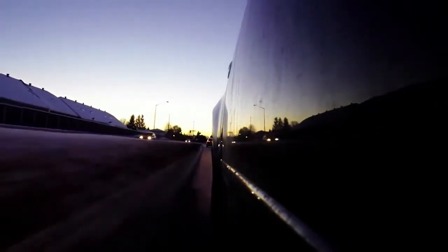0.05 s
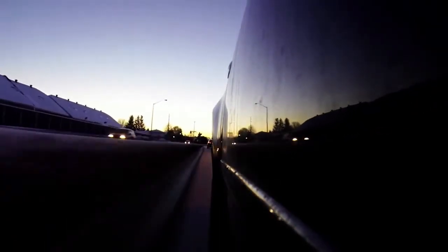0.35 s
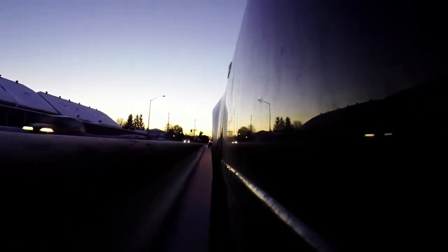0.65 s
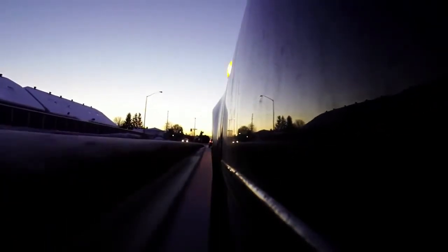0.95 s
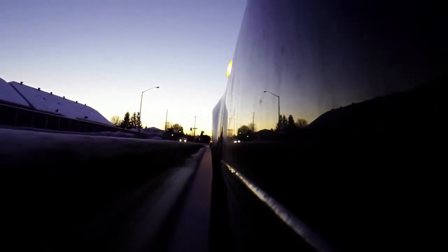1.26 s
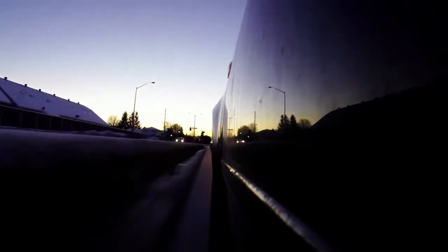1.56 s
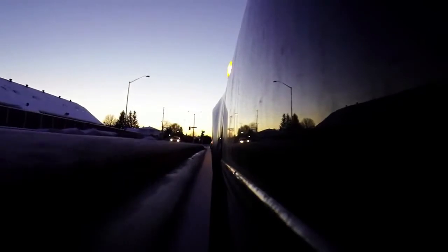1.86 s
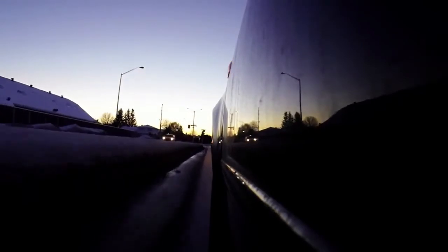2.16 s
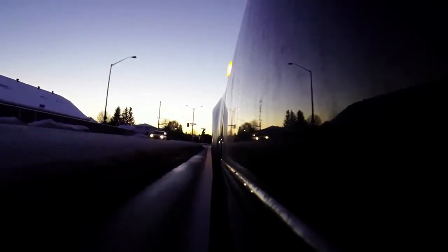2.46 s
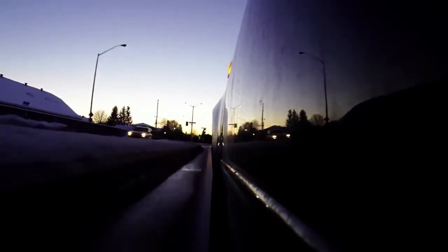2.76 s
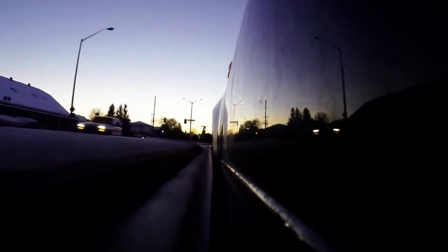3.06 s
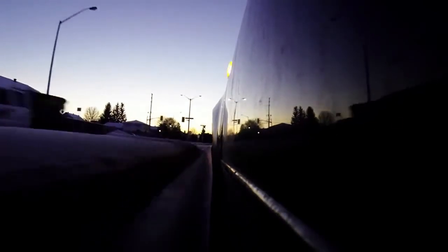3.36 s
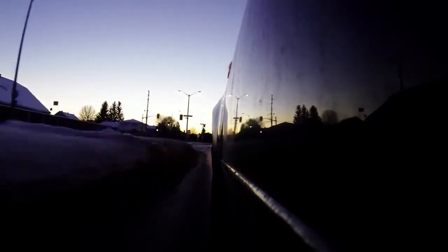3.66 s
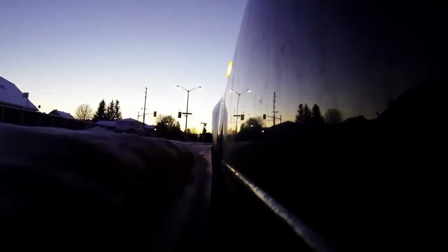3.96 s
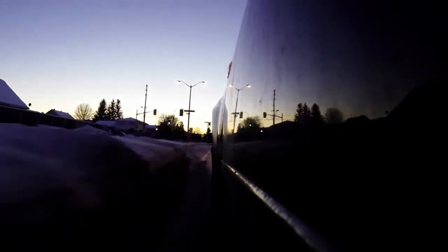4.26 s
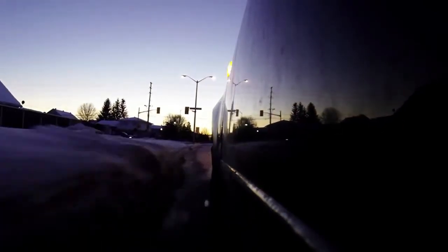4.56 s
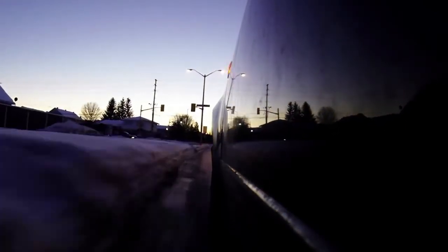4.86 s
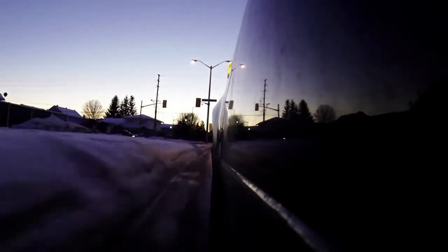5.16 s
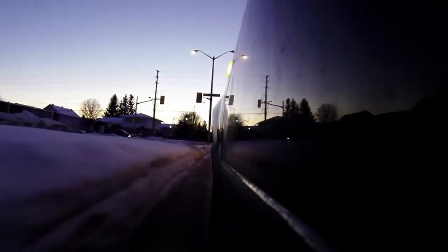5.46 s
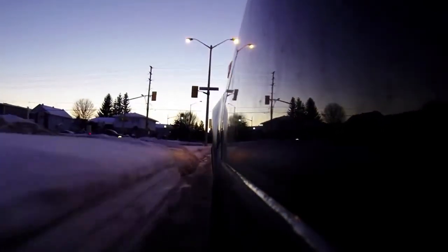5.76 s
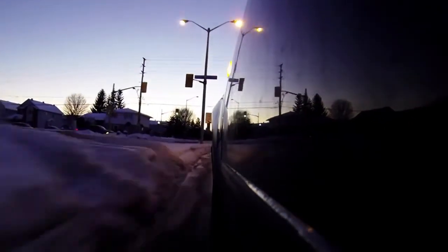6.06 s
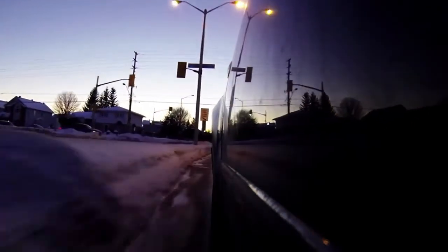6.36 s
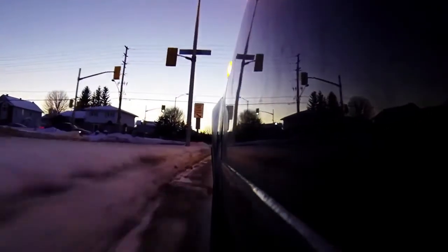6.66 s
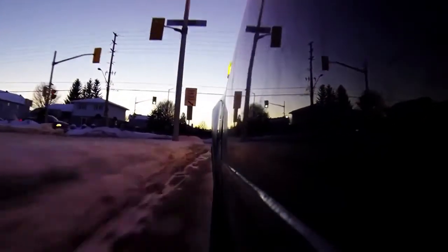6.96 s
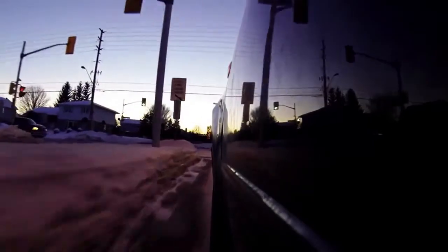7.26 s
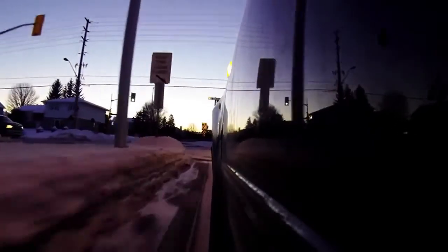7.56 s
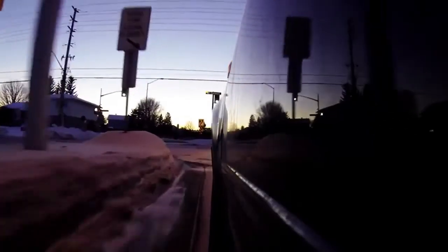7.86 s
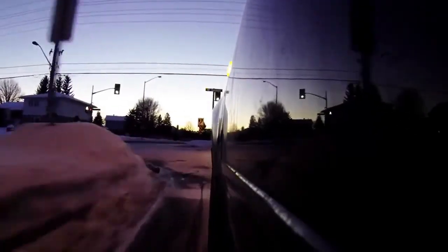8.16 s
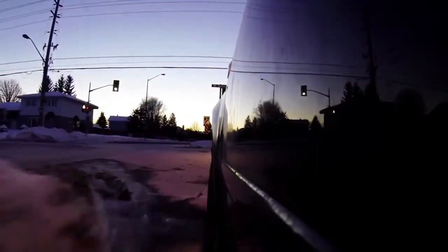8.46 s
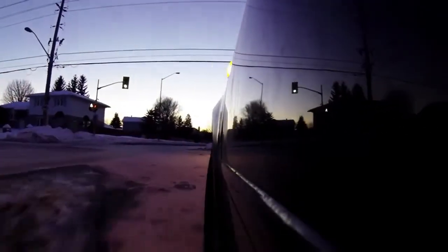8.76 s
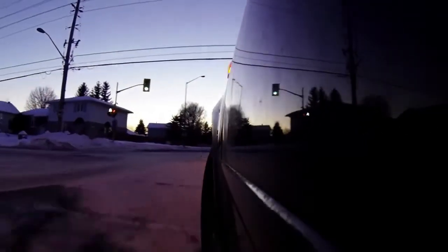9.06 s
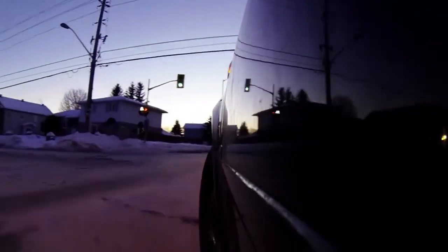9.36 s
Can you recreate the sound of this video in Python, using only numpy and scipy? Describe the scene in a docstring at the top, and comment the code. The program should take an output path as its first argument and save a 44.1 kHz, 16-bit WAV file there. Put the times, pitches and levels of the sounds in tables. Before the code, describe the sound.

A diesel car slows on a slushy road with a low exhaust drone, a sinking turbo whistle and thumping wind gusts.

```python
"""A four-cylinder diesel car with an open exhaust coasts down a winter road to idle, then pulls away.
The pipe drones at the firing rate and the turbo whistle winds down, warbling with every exhaust pulse.
The microphone rides on the car's flank: wind buffets it, tyres roar and throw slush and grit,
a brake chirps faintly, and a limiter ducks after the hardest gusts."""
import sys
import numpy as np
from scipy import signal
from scipy.fft import rfft, irfft, next_fast_len
from scipy.io import wavfile
from scipy.ndimage import uniform_filter1d, minimum_filter1d, map_coordinates

SR = 44100
rng = np.random.default_rng(int(sys.argv[2]) if len(sys.argv) > 2 else 0)


def master_out(mix):
    """Clip the mix to full scale and print it as 16-bit PCM to the path in sys.argv[1]."""
    frames = np.transpose(np.atleast_2d(mix))
    ceiling = np.clip(frames, -1, 1)
    pcm = np.round(ceiling * 32767).astype(np.int16)
    wavfile.write(sys.argv[1], SR, pcm)


N = 414523
TOP_HZ = 14900

# hard gusts on the microphone: time_s, peak_db, length_s
GUSTS = [(.122, -4, 0.0042), (.609, -2.5, .0032), (.6445, -4, 0.00061), (1.039, -4, .004),
         (1.194, -1.5, .003), (2.007, .5, 0.0025), (2.243, -5, .003), (2.804, 0, 0.0047), (2.887, -4, .003),
         (3.255, -2, 0.0029), (3.937, -.5, .004), (4.821, -1.5, .0035), (5.402, -1.5, 0.0017),
         (5.438, -3.5, 0.0016), (6.316, -3.5, .004), (6.948, .5, .007), (7.823, -4.5, .006)]


def amp(db):
    """Decibels to gain."""
    return 10 ** (np.asarray(db) / 20)


def unit(x):
    """Scale to rms 1."""
    return x / np.sqrt(np.mean(x ** 2) + 1e-20)


def along(points, hz):
    """Read (freq_hz, value) points on a log frequency axis."""
    freqs, values = np.transpose(points)
    return np.interp(np.log(hz + 1), np.log(freqs + 1), values)


def curves(rows):
    """An automation curve for each column after the time."""
    times, *columns = np.transpose(rows)
    return [np.interp(np.arange(N) / SR, times, column) for column in columns]


def wobble(rate_hz):
    """A smooth random curve with rate_hz knots a second."""
    knots = rng.standard_normal(int(N * rate_hz / SR) + 4)
    grid = np.arange(0, len(knots) - 1, 1 / 20)
    return np.interp(np.arange(N) * (rate_hz / SR), grid, map_coordinates(knots, [grid]))


def filtered(x, response):
    """EQ x with a gain given as a function of frequency."""
    size = next_fast_len(N + SR // 2)
    return irfft(rfft(x, size) * response(np.fft.rfftfreq(size, 1 / SR)), size)[:N]


def noise(spectrum, swell=1):
    """Noise of rms 1, shaped by swell, then coloured by (freq_hz, gain_db) points."""
    return unit(filtered(swell * rng.standard_normal(N), lambda hz: amp(along(spectrum, hz))))


def narrow(phase, width_hz):
    """A narrow band of noise of rms 1 around a running phase."""
    return unit(wobble(width_hz) * np.cos(phase) + wobble(width_hz) * np.sin(phase))


def add(track, start_s, sound):
    """Mix a short sound into the track."""
    part = track[max(round(start_s * SR), 0):][:len(sound)]
    part += sound[:len(part)]


def swells(rows):
    """A bell-shaped swell for each (time_s, level_db, width_s) row."""
    t = np.arange(N) / SR
    return sum(amp(db) * np.exp(-((t - s) / width) ** 2 / 2) for s, db, width in rows)


def around_gusts(side, span_s):
    """A 0-1 envelope rising into (side -1) or trailing (side 1) each gust, scaled by its strength."""
    t = np.arange(N) / SR
    strongest_db = max(db for _, db, _ in GUSTS)
    slopes = [amp(db - strongest_db) * np.exp(-np.abs(t - s) / span_s) * (side * (t - s) > 0)
              for s, db, _ in GUSTS]
    return uniform_filter1d(np.max(slopes, axis=0), size=SR // 100)


def exhaust(firing_hz, phase):
    """Each firing sends a pulse down the open pipe; under fuel the orders fill in to a growl."""
    # engine load: time_s, level_db
    load = [(0, -25), (1, -24), (2.2, -28.5), (2.8, -23), (3.8, -25), (4.4, -22), (5, -24), (6.2, -26),
            (6.9, -32), (7.9, -30), (8.2, -27), (9.05, -24.5), (9.3, -22)]
    # fuel returns near idle: time_s, blend (0 coasting, 1 fuelled)
    fuelling = [(5.3, 0), (5.9, 1)]
    # tailpipe response: freq_hz, coasting_db, fuelled_db
    pipe = [(30, -1, 1.5), (42, -3, -2), (58, 2, 1), (76, -7, .5), (90, -3, 1.5), (104, -10, 0),
            (122, -7, -.5), (148, -2, 1), (176, 0, .5), (205, -14, -9), (235, -11, -10), (280, -19, -16),
            (320, -23, -25), (420, -28, -22), (520, -34, -27), (900, -45, -40)]
    # unequal cylinders under fuel: firing_multiple, level_db
    half_orders = [(5.5, -7.5), (6.5, -9), (7.5, -7.5)]
    jitter_rad, uneven_db = .1, 2.4  # rough running
    load_db, = curves(load)
    fuel, = curves(fuelling)
    coasting, fuelled = np.array(pipe)[:, :2], np.array(pipe)[:, ::2]
    drone = np.zeros(N)
    shaky = phase + jitter_rad * wobble(20)
    for k in range(1, 13):
        order_db = (1 - fuel) * along(coasting, k * firing_hz) + fuel * along(fuelled, k * firing_hz)
        drone += amp(order_db + uneven_db * wobble(9)) * np.sin(k * shaky + rng.uniform(0, 2 * np.pi))
    for k, db in half_orders:
        drone += fuel * amp(db) * np.sin(k * shaky + rng.uniform(0, 2 * np.pi))
    return np.sqrt(2) * drone * amp(load_db + 1.1 * wobble(26))


def turbo(phase):
    """Each exhaust pulse bends the whistle in an arch, loudest on the dive; at speed it turns breathy."""
    # rotor whistle: time_s, pitch_hz, level_db
    whistle = [(0, 8430, -71), (1.5, 7500, -75), (4.7, 5700, -73), (4.97, 5470, -60), (5.22, 5230, -65.5),
               (5.37, 5130, -54), (5.44, 5017, -59), (5.8, 4800, -53), (6.05, 4726, -57), (6.4, 4370, -61),
               (6.6, 4150, -53), (6.81, 4020, -41), (6.99, 3870, -52), (7.05, 3820, -44),
               (7.25, 3720, -45.5), (7.5, 3530, -44), (8, 3316, -39), (8.5, 3280, -38), (8.64, 3300, -29.5),
               (8.73, 3270, -36), (8.8, 3296, -30), (8.87, 3234, -35.5), (9.05, 3216, -36.5),
               (9.2, 3350, -30.5), (9.4, 3590, -35)]
    # arch over one pulse: cycle_share, bend_hz, throb_db
    arch = [(0, -175, -6), (.3, 20, -9), (.56, 115, -3.5), (.72, 70, .5), (.87, -40, .5), (1, -175, -6)]
    # breath around the tone: pitch_hz, relative_gain
    breath = [(3300, .2), (4000, .15), (5500, .2), (7500, 1.5)]
    whistle_hz, whistle_db = curves(whistle)
    pulse, cycle = np.divmod(phase / (2 * np.pi) + .5, 1)
    depth, strength = rng.standard_normal((int(pulse[-1]) + 1, 2))[pulse.astype(int)].T  # per pulse
    share, bend_hz, throb_db = np.transpose(arch)
    arch_hz = np.interp(cycle, share, bend_hz) * amp(1.5 * depth) * np.minimum(1, 4000 / whistle_hz) ** 2
    fray_hz = (18 + 35 * cycle ** 3) * np.maximum(1, whistle_hz / 5500) ** 7
    whistle_phase = 2 * np.pi * np.cumsum(whistle_hz + arch_hz + fray_hz * wobble(450)) / SR
    throb = amp(np.interp(cycle, share, throb_db) + 2.3 * strength * np.sin(np.pi * cycle ** 2))
    tone = np.sin(whistle_phase) + along(breath, whistle_hz) * narrow(whistle_phase, width_hz=650)
    # on a slow rotor the tail of each pulse spits a little air
    slow_rotor = np.interp(whistle_hz, [3600, 4100], [1, 0])
    spit_eq = [(1500, -30), (2400, -16), (2750, -9), (3100, 5), (3500, -5), (3850, -8), (4400, -24),
               (5500, -31), (12000, -65)]
    spit = noise(spit_eq, swell=cycle ** 6 * np.sin(np.pi * cycle))
    return amp(whistle_db) * (unit(throb * tone) + slow_rotor * amp(-10.5) * spit)


def tyres(eddies, surge_db):
    """The tread roars and hums, air rushes along the flank and fine spray spits off the road."""
    # road noise: time_s, roar_db, rush_db
    road = [(0, -28, -33.5), (.3, -30.5, -32.5), (.6, -29.5, -32), (1.25, -33, -36.5), (1.45, -28, -31.5),
            (1.75, -30, -33), (2.45, -35, -35.5), (2.62, -27, -28.5), (2.79, -25, -30), (2.82, -28, -30.5),
            (3, -33, -35), (3.15, -31, -32), (3.8, -32, -33.5), (4.08, -34, -34.5), (4.25, -28.5, -31),
            (4.75, -28.5, -33), (5.45, -33.5, -35.5), (6.15, -27.5, -32), (7.15, -35.5, -35.5),
            (7.6, -31, -35.5), (8.1, -30.5, -35.5), (9, -25, -30.5), (9.4, -27.5, -32.5)]
    # tread hum, wandering with the road surface: time_s, pitch_hz
    tread_hum = [(0, 982), (1.5, 932.7), (3.8, 931), (4.3, 1068), (4.8, 1044), (5.5, 951), (6.1, 1090),
                 (7.6, 932), (8.6, 988.5), (9.3, 1043)]
    # colours of tread, air rush and spray: freq_hz, gain_db
    tread_eq = [(200, -36), (600, -4.5), (780, -2), (920, 1), (1060, -2.5), (1200, -3.5), (1500, -18.5),
                (2200, -27), (8000, -110)]
    rush_eq = [(700, -23.5), (1300, 2.5), (1550, 1.5), (1950, 2.5), (2150, -3.5), (2400, -12), (2750, -15),
               (3100, -9), (3450, -15.5), (3900, -20), (4400, -27), (5000, -26.5), (6000, -40),
               (14000, -100)]
    spray_eq = [(3500, -13), (5000, 9), (5800, 3.5), (6900, 0), (8400, 3.5), (9500, -2.5), (10300, -2),
                (11400, -8.5), (12700, -8.5), (14000, -16), (15000, -28.5)]
    roar_db, rush_db = np.array(curves(road)) + surge_db
    hum_hz, = curves(tread_hum)
    hum = narrow(2 * np.pi * np.cumsum(hum_hz) / SR, width_hz=190)
    roar = amp(roar_db) * (amp(-1.5) * noise(tread_eq, amp(.41 * eddies)) + amp(-7) * hum)
    rush = amp(rush_db) * noise(rush_eq, amp(eddies + .84 * wobble(200)))
    spits = 4 * np.maximum(wobble(220) - .8, 0)
    spray = amp(rush_db - 29) * noise(spray_eq, amp(1.9 * eddies + spits))
    return roar + rush + spray


def slush():
    """Crumbs of wet snow and sand patter on the flank, a few of them large, over a smooth wet swish."""
    # patter of small crumbs: time_s, level_db
    crumb_levels = [(0, -44.5), (2, -54), (5.3, -56), (5.8, -48), (6.7, -45.5), (7.3, -57), (8.1, -53),
                    (8.8, -49), (9.4, -52)]
    # wet tyre swish: time_s, level_db
    swish_levels = [(0, -70.5), (2, -81), (5, -74), (6.3, -66), (7.2, -77), (8.1, -68.5), (8.8, -60.5),
                    (9.4, -62)]
    crumbs_per_s = 120
    crumb_eq = [(1000, -25), (4000, 1), (8500, 3), (13000, -2), (15000, -14)]
    swish_eq = [(3000, -25), (5100, 5), (6700, -8.5), (8400, 0), (9500, -13.5), (14000, -22)]
    crumb_db, = curves(crumb_levels)
    swish_db, = curves(swish_levels)
    hits = rng.random(N) < crumbs_per_s / SR
    size_db = 4 * np.minimum(rng.exponential(size=N), 3)
    crumbs = hits * amp(crumb_db + size_db) * rng.choice([-1, 1], N)
    patter = filtered(crumbs, lambda hz: amp(along(crumb_eq, hz)))
    return patter + amp(swish_db) * noise(swish_eq)


def wind(eddies, surge_db):
    """Eddies roll over the microphone: deep buffeting that tears into flutter at each pressure trough."""
    # airflow: time_s, buffet_db, flutter_db
    airflow = [(0, -12.5, -24), (.3, -15, -26), (.6, -15, -25), (.9, -17.5, -27.5), (1.45, -14.5, -25.5),
               (2.3, -16.5, -29), (2.9, -16.5, -25.5), (4.1, -15.5, -28), (4.6, -14.5, -27.5),
               (5.6, -18, -30.5), (6.2, -16.5, -29.5), (6.8, -15, -27.5), (7.3, -16.5, -28.5),
               (7.8, -15, -28), (8.35, -19, -28.5), (9.4, -15.5, -29)]
    # the car slows: time_s, blend (0 at speed, 1 crawling)
    slowing = [(7.7, 0), (8.35, 1)]
    # colours of buffet and flutter, and the buffet's dulling at a crawl: freq_hz, gain_db
    buffet_eq = [(8, -11.5), (18, 0), (28, 3.5), (50, 3.5), (75, 0.5), (110, -2), (170, -7), (240, -12.5),
                 (330, -21.5), (600, -67.5), (2000, -120)]
    flutter_eq = [(100, -18), (200, -3.5), (280, 0), (400, -1), (600, -5), (850, -9.5), (1300, -14),
                  (2000, -23), (2800, -36), (12000, -100)]
    crawl_eq = [(40, 0), (80, -2), (120, -5.5), (170, -6), (240, -2)]
    buffet_db, flutter_db = curves(airflow)
    crawl, = curves(slowing)
    wake_db = 3.5 * around_gusts(side=1, span_s=.073)  # a hard gust leaves stronger buffeting behind
    pressure = noise(buffet_eq, amp(1.2 * wobble(35)))
    dulled = filtered(pressure, lambda hz: amp(along(crawl_eq, hz)))
    buffet = (1 - crawl) * pressure + crawl * dulled
    flutter = noise(flutter_eq, amp(1.65 * eddies + 1.43 * wobble(160) - 2 * pressure))
    return amp(buffet_db + wake_db) * buffet + amp(flutter_db + surge_db) * flutter


def surges():
    """Passing surges of air, and one brief dip in level, ride the wind flutter and road noise."""
    # level rides: time_s, flutter_db, road_db, width_s
    rides = [(.12, 5, 0, .035), (.82, -4, -.5, .03), (1.46, 4, 2.5, .035), (2.235, 7, 3.5, .022),
             (3.03, 4, 1, .018), (3.43, 3.5, .5, .04), (3.88, 3.5, 1.5, .025)]
    t = np.arange(N) / SR
    return sum(np.outer([flutter_db, road_db], np.exp(-((t - s) / width) ** 2 / 2))
               for s, flutter_db, road_db, width in rides)


def thumps():
    """Short, dull bursts of rumble stand out of the buffeting."""
    # dull thumps: time_s, level_db, width_s
    bursts = [(.1, -17, 0.029), (.66, -23, 0.023), (1.98, -18, 0.017), (4.33, -18.5, 0.028),
              (4.55, -19, 0.04), (5.42, -14.5, 0.016), (6.04, -18.5, 0.039), (6.27, -17, 0.045),
              (6.93, -16.5, 0.038)]
    # their colour: freq_hz, gain_db
    thump_eq = [(50, -19), (110, -0.5), (170, 0), (250, -7.5), (400, -17.5), (1000, -56), (3000, -110)]
    return swells(bursts) * noise(thump_eq)


def gusts():
    """A hard gust sucks at the diaphragm, lets it rebound and leaves a short puff."""
    track, t = np.zeros(N), np.arange(SR // 12) / SR
    for s, db, length in GUSTS:
        age = t / length
        suction = -age * (2 - age) * np.exp(-age)
        puff = .41 * age * np.exp(-age) * rng.standard_normal(len(t))
        add(track, s - length / 2, amp(db) * (suction + puff) / np.abs(suction).max())
    return filtered(track, lambda hz: 1 / (1 + (hz / 1500) ** 6))


def grit():
    """Stones and ice tick against the bodywork, each a dry burst in one band."""
    # impacts: start_s, peak_db, centre_hz
    impacts = [(.6435, -12, 880), (5.426, -17.5, 696), (5.79, -36, 12520), (5.883, -46, 8480),
               (6.452, -25, 3200), (6.454, -43, 10700), (6.505, -20, 2100), (6.52, -28, 12600),
               (6.521, -30, 5000), (6.604, -40, 13060), (6.668, -34, 3580), (6.947, -36, 7000),
               (7.1, -44.5, 8600), (7.397, -14.5, 765), (7.773, -17, 456)]
    track, t = np.zeros(N), np.arange(SR // 30) / SR
    for s, db, hz in impacts:
        band = signal.butter(2, np.clip([hz * .77, hz * 1.26], 100, SR / 2 - 100), "band", fs=SR)
        high_cut = signal.butter(2, min(2.5 * hz, TOP_HZ), fs=SR)
        ring_s = .002 + 9 / hz  # bigger, lower stones ring longer
        burst = rng.standard_normal(len(t)) * amp(-60 * t / ring_s)
        tick = signal.lfilter(*high_cut, signal.lfilter(*band, burst))
        add(track, s, amp(db) * tick / np.abs(tick).max())
    return track


def brake():
    """A pad touches its disc and sings for an instant."""
    # brake chirp: time_s, level_db, width_s
    chirps = [(6.243, -57, 0.012)]
    pitch_hz = 8620 + 50 * wobble(500)
    return swells(chirps) * unit(np.sin(2 * np.pi * np.cumsum(pitch_hz) / SR))


def scene():
    """The firing rate drives pipe and turbo; one eddy field stirs both wind flutter and road noise."""
    # engine speed: time_s, firing_hz
    firing = [(0, 64.2), (1.2, 62), (2, 60), (2.5, 58.6), (3.2, 55.5), (4, 50), (4.4, 47), (5, 43.7),
              (5.5, 41.3), (6, 39.1), (6.27, 38.3), (6.5, 33.8), (6.8, 32.7), (7.5, 30), (9.06, 29.75),
              (9.24, 34.7), (9.4, 35.2)]
    firing_hz, = curves(firing)
    phase = 2 * np.pi * np.cumsum(firing_hz) / SR
    eddies = .35 * wobble(24) + .76 * wobble(70)
    build_db = 4 * around_gusts(side=-1, span_s=.051)  # air noise builds ahead of each hard gust
    flutter_surge_db, road_surge_db = surges() + build_db
    engine = exhaust(firing_hz, phase) + turbo(phase)
    car = engine + tyres(eddies, road_surge_db) + grit() + slush() + brake()
    # a hard gust sweeps the ordinary buffeting aside while it lasts
    duck = 1 - np.minimum(swells([(s, 0, 2 * length) for s, _, length in GUSTS]), 1)
    return (car + duck * (wind(eddies, flutter_surge_db) + thumps()) + gusts())[None]


def record(dry):
    """A limiter ducks peaks over its ceiling, holds and recovers slowly; a steep high cut follows."""
    ceiling, hold_s, recover_db_per_s = .78, .035, 24.5
    hold, lookahead, ramp = int(hold_s * SR), SR // 500, SR // 300
    needed_db = 20 * np.log10(ceiling / np.maximum(np.abs(dry[0]), ceiling))
    held_db = minimum_filter1d(needed_db, hold, origin=hold // 2 - lookahead)
    recovery_db = recover_db_per_s * np.arange(N) / SR
    gain_db = np.minimum.accumulate(held_db - recovery_db) + recovery_db
    gain = uniform_filter1d(amp(gain_db), ramp)
    fade_out = np.minimum(1, np.arange(N)[::-1] / ramp)
    return filtered(dry[0] * gain * fade_out, lambda hz: hz < TOP_HZ)[None]


dry = scene()
out = record(dry)
master_out(out)
```